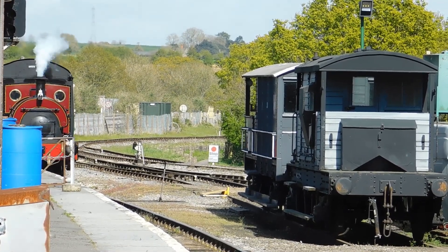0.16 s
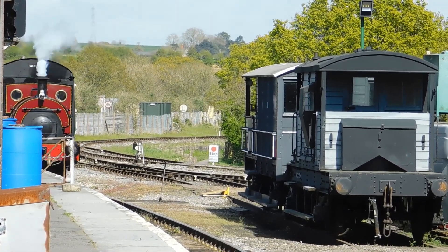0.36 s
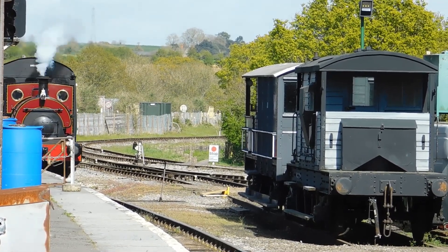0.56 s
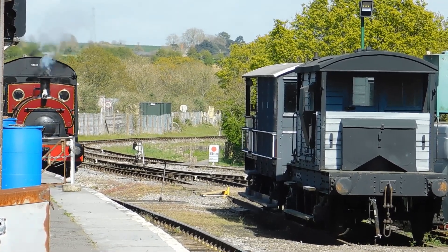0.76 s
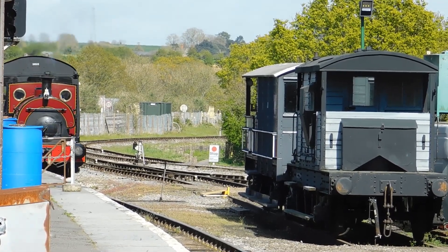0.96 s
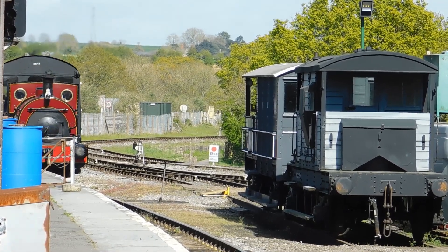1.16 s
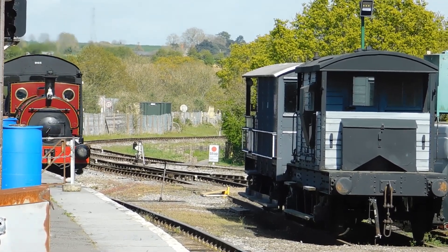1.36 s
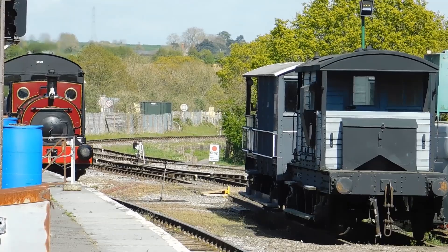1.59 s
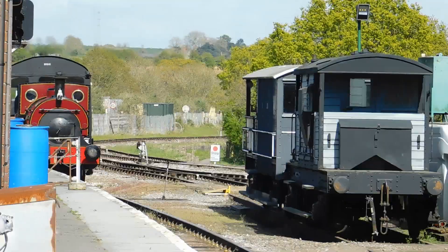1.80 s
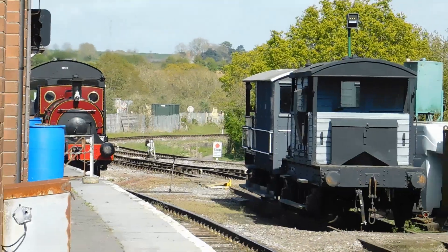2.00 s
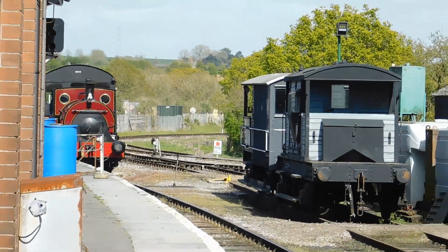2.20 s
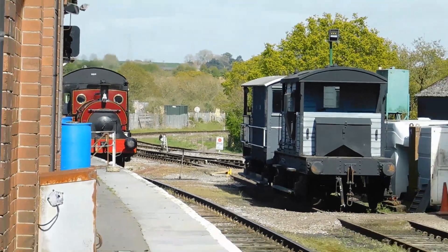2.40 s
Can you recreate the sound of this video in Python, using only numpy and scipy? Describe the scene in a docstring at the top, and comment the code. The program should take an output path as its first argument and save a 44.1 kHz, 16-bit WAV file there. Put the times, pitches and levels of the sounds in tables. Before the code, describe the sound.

One steam train whistle toots and echoes across a yard over a softly simmering engine.

```python
"""One whistle blast from a small rolling steam locomotive, heard in stereo from the platform.
The whistle's bell sounds a low note, jumps up a semitone as the valve opens wide, and sags as it shuts;
the steam jet hisses at its lip and droplets add a gritty spray. Wagons, buildings and trees throw the
blast back across the yard. Underneath, the engine simmers, leaks steam, rumbles and knocks once,
while wind buffets the microphone from the left."""
import sys
import numpy as np
from scipy import signal
from scipy.fft import rfft, irfft
from scipy.io import wavfile
from scipy.ndimage import uniform_filter1d

SR = 44100
rng = np.random.default_rng(int(sys.argv[2]) if len(sys.argv) > 2 else 0)


def dump_mix(stems):
    """Bounce the given channels to the path in sys.argv[1] as a 16-bit WAV at rate SR."""
    frames = np.atleast_2d(stems).T  # one column per channel
    limited = np.clip(frames, -1, 1)  # hard clip at full scale
    pcm = np.round(limited * 32767).astype(np.int16)
    wavfile.write(sys.argv[1], SR, pcm)


N = 108045
T = np.arange(N) / SR
FREQS = np.maximum(np.arange(N // 2 + 1) * SR / N, 1)

# Noise at the microphone. Each row: frequency in Hz, left-right correlation.
MIC_CORRELATION = [(100, 0.73), (800, 1), (1400, 0.56), (2800, 0.076), (6000, 0.39), (13000, 0.19)]
# Its lean to the left. Each row: frequency in Hz, left over right in dB.
MIC_BALANCE = [(100, 7), (800, 2), (1300, 2), (2400, 2), (6000, 0), (15000, 1.5)]
# Wind on the microphone. Each row: centre and half length in seconds, level in dB, top edge in Hz.
GUSTS = [(0.213, 0.022, -37.5, 99.5), (.335, 0.011, -41, 300), (.595, 0.015, -36.5, 192),
         (0.791, 0.0093, -33.5, 220), (0.884, 0.023, -39, 160), (1.085, 0.025, -35.5, 155),
         (1.144, .009, -30, 290), (1.199, 0.033, -39, 230), (1.352, 0.0057, -33, 253),
         (1.412, 0.015, -38, 200), (1.512, 0.0039, -37, 144), (1.647, 0.0088, -35, 306),
         (2.053, 0.034, -37.5, 170), (2.164, 0.022, -33, 447), (2.231, 0.021, -35.5, 199),
         (2.346, 0.028, -37.5, 250), (2.426, 0.042, -41, 221)]

# Colours of the locomotive's noises. Each row: frequency in Hz, relative spectral density in dB.
SIMMER_SPECTRUM = [(530, -45), (970, -21), (1060, -10), (1290, -2), (1880, -9.5), (2300, -13),
                   (3180, -13.5), (3710, -17.5), (4200, -21.5), (5180, -25), (7150, -26.5), (9500, -38),
                   (15500, -46)]
LEAK_SPECTRUM = [(700, -9), (1300, -2), (1900, 6), (2600, -11.5), (4800, -10), (7500, -19.5), (10000, -24),
                 (15500, -29)]
SIZZLE_SPECTRUM = [(2500, -24), (4500, 1.5), (6000, 4), (8000, -7), (11000, -14.5), (15500, -27)]
SPRAY_SPECTRUM = [(2500, -18), (6000, -0.5), (15500, -2.5)]
JET_SPECTRUM = [(300, -39.5), (560, -23), (700, 12.5), (860, 0.5), (980, 2), (1200, -3), (1900, -7),
                (2900, -1), (3600, -11), (5200, -14.5), (8000, -24), (11000, -27), (15500, -32)]
RUMBLE_SPECTRUM = [(20, -7.5), (50, -5.5), (120, -9), (250, -20), (450, -20), (750, -13),
                   (1100, -27), (2500, -52), (15000, -79.5)]
# Rise and fall of the steam noises. Each row: time in seconds, level in dB.
SIMMER_LEVEL = [(0, -44), (.6, -49), (1.2, -43.5), (1.7, -48), (2.1, -45.5), (2.45, -47.5)]
LEAK_LEVEL = [(0, -60.5), (.6, -53), (1.05, -51.5), (1.35, -50), (1.62, -45), (1.65, -57), (1.77, -52.5),
              (2.45, -94)]
SIZZLE_LEVEL = [(0, -55), (.25, -55), (.6, -71), (2.45, -75)]
SPRAY_LEVEL = [(.21, -79.5), (.28, -60), (.61, -60.5), (.65, -72.5), (.685, -60.5), (.82, -60),
               (.86, -65.5), (1.06, -64)]
JET_LEVEL = [(.20, -80.5), (.235, -36.5), (.33, -45.5), (.43, -42.5), (.56, -49), (.65, -58.5), (.69, -34),
             (.78, -38.5), (.83, -42), (.90, -51.5)]
# Resonances and hollows of the simmer. Each row: centre and half width in Hz, level or cut in dB.
SIMMER_PEAKS = [(1077.5, 7.2, -59), (1143, 16, -53.5), (1251.4, 35, -51), (1350, 16, -61),
                (1433, 9.1, -53.5), (3200, 48, -60.5), (4124, 89, -64)]
SIMMER_DIPS = [(1563, 13, -16), (1953, 45, -14.5)]

# The yard's decay. Each row: frequency in Hz, seconds to fall by 60 dB.
YARD_T60 = [(700, 2.7), (1900, 2.24), (3200, 1.7), (8000, 0.84), (15000, 1.3)]
# The yard's colour. Each row: frequency in Hz, relative gain in dB.
YARD_COLOUR = [(730, -5.5), (1150, 2), (1900, 2.5), (3000, 2.5), (5000, -3.5), (8000, -1.5), (12000, 0)]
# Surfaces, near to far. Each row: delay in seconds, low and high note gain in dB before dulling.
ECHOES = [(.05875, -24.3, -12.4), (.10884, -23.8, -1.4), (.14707, -12.2, -21.6), (.24788, -10, -6.7),
          (.31289, -26.3, -10.4), (.43705, -24.3, -14.7), (.52631, -27, -7.8), (.66919, -27.5, -20.8),
          (.9126, -31.5, -24.9), (1.10438, -39, -28.1)]

# Pitch of the whistle's notes. Each row: time in seconds, pitch in Hz.
LOW_PITCH = [(.215, 763.7), (.25, 756.9), (.28, 748.9), (.34, 746.2), (.40, 758.1), (.43, 760.1),
             (.52, 757), (.58, 759.9), (.67, 757.7)]
HIGH_PITCH = [(.667, 817.9), (.69, 799.9), (.715, 789.4), (.75, 803.9), (.81, 788), (.88, 796.5)]
SAG_PITCH = [(.785, 762.7), (.808, 753.7), (.832, 732.2), (.857, 717.2), (.915, 715.6)]
# Their fundamentals. Each row: time in seconds, level in dB.
LOW_LEVEL = [(.215, -46.5), (.224, -28.6), (.24, -30.4), (.262, -13.1), (.365, -12.8), (.42, -18),
             (.435, -15.1), (.545, -12.6), (.577, -14.9), (.61, -11.4), (.635, -19.3), (.705, -17.3),
             (.746, -26.4)]
HIGH_LEVEL = [(.667, -33.7), (.685, -13.5), (.72, -14.1), (.75, -15.9), (.81, -28.3), (.865, -20.1),
              (.885, -24.2)]
SAG_LEVEL = [(.785, -37.9), (.808, -10.5), (.832, -17.3), (.857, -30.2), (.915, -35.4)]
# Their overtones. Each row: time in seconds, levels of partials two, three and four in dB.
LOW_OVERTONES = [(.215, -55.5, -61, -57.5), (.243, -40.5, -35.5, -46.5), (.295, -49, -48, -46.5),
                 (.365, -47, -40, -48.5), (.432, -34.5, -32, -44.5), (.48, -39, -38, -52.5),
                 (.595, -35.5, -36, -51.5), (.66, -48.5, -56.5, -65)]
HIGH_OVERTONES = [(.667, -45.5, -57, -67), (.686, -35, -35.5, -44), (.74, -30, -44, -43),
                  (.79, -43.5, -42, -49.5), (.885, -40, -51, -65)]
SAG_OVERTONES = [(.785, -34.5, -37.5, -48.5), (.915, -57, -48, -69.5)]
# Top partials against the fourth. Each row: multiple, dB in the low and sagging notes, dB in the high.
TOP_PARTIALS = [(5, -12.5, -0.5), (6, -11.5, -11.5), (7, -21, -17)]

TREBLE_FROM_HZ = 780   # above this, echoes dull and the wagons scatter


def from_db(db):
    """Decibels to gain."""
    return 10 ** (np.asarray(db) / 20)


def unit_rms(x):
    """Scale to unit power."""
    return x / np.sqrt(np.mean(x ** 2) + 1e-20)


def in_time(rows):
    """The columns of a curve, joined by straight lines."""
    times, *columns = np.transpose(rows)
    return [np.interp(T, times, column) for column in columns]


def at_hz(rows, hz):
    """Read a spectrum on a log-frequency axis."""
    row_hz, values = np.transpose(rows)
    return np.interp(np.log(hz), np.log(row_hz), values)


def pan(left_db):
    """Left and right gains for a level difference."""
    return from_db(np.array([[.5], [-.5]]) * left_db)


def swell(centre_s, half_length_s):
    """A bell-shaped rise and fall."""
    return np.exp(-.5 * ((T - centre_s) / half_length_s) ** 2)


def gate(rows):
    """Open from the first to the last point of a curve."""
    return uniform_filter1d(((T > rows[0][0]) & (T < rows[-1][0])) * 1., size=200)


def drift(rate_hz):
    """A random wander with spread 1."""
    return unit_rms(irfft(rfft(rng.standard_normal(N)) / (1 + (FREQS / rate_hz) ** 2), N))


def stereo_noise(colour):
    """Unit-power noise, left of the microphone and wider in the treble."""
    mid, side = rfft(rng.standard_normal((2, N)))
    alike = at_hz(MIC_CORRELATION, FREQS)
    pair = np.sqrt(1 + alike) * mid + np.sqrt(1 - alike) * side * [[1], [-1]]
    return unit_rms(irfft(pair * colour * pan(at_hz(MIC_BALANCE, FREQS)), N))


def hiss(spectrum):
    """Stereo noise from a spectrum table."""
    return stereo_noise(from_db(at_hz(spectrum, FREQS)))


def resonance(hz, half_width_hz):
    """Stereo noise in one resonance."""
    return stereo_noise(1 / (1 + ((FREQS - hz) / half_width_hz) ** 2))


def wind():
    """Short low buffets right on the microphone, mostly on its left side."""
    gusts = 0
    for centre_s, half_length_s, db, top_hz in GUSTS:
        buffet = stereo_noise(1 / (1 + (FREQS / top_hz) ** 3.36))
        gusts += from_db(db) * swell(centre_s, half_length_s) * buffet
    return gusts * from_db([[0], [-12.5]])


def engine():
    """Simmering steam with singing resonances, two leaks, one dull knock and the rumble of rolling."""
    dips_db = sum(db * np.exp(-((FREQS - hz) / width) ** 2) for hz, width, db in SIMMER_DIPS)
    simmer_gain = from_db(in_time(SIMMER_LEVEL)[0] + 2 * drift(rate_hz=9.6))
    simmer = simmer_gain * stereo_noise(from_db(at_hz(SIMMER_SPECTRUM, FREQS) + dips_db))
    singing = sum(from_db(db) * resonance(hz, width) for hz, width, db in SIMMER_PEAKS)
    leak = from_db(in_time(LEAK_LEVEL)[0]) * hiss(LEAK_SPECTRUM)
    sizzle = from_db(in_time(SIZZLE_LEVEL)[0]) * hiss(SIZZLE_SPECTRUM)
    knock = from_db(-40.5) * swell(1.817, half_length_s=.01) * resonance(670, half_width_hz=160)
    rumble = from_db(-49) * hiss(RUMBLE_SPECTRUM)
    return simmer + singing + leak + sizzle + knock + rumble


def yard_scatter(blast):
    """Trees and wagons around the platform scatter the blast into a tail that dies band by band."""
    build_s = .026
    edges_hz = np.geomspace(225, 15800, 10)
    wagons = from_db(1) * swell(.18, half_length_s=.023)   # a treble burst off the parked wagons
    scatter, response = rfft(stereo_noise(1.)), 0
    for low, high in zip(edges_hz, edges_hz[1:]):
        hz = np.sqrt(low * high)
        band = irfft(scatter * ((FREQS >= low) & (FREQS < high)), N)
        envelope = from_db(-60 * T / at_hz(YARD_T60, hz)) + wagons * (low > TREBLE_FROM_HZ)
        response += band * from_db(at_hz(YARD_COLOUR, hz)) * envelope
    response *= (1 - np.exp(-T / build_s)) * np.sqrt(10 / SR)
    return from_db(-7.5) * signal.fftconvolve(blast.mean(0)[None], response, axes=1)[:, :N]


def echoes(low, high):
    """Single reflections, duller the more distant the surface; each surface favours one note."""
    dull_db_per_octave_s, lag_s = 27, .0001
    size = 2 * N
    hz = np.arange(N + 1) * SR / size
    octaves = np.log2(np.maximum(hz / TREBLE_FROM_HZ, 1))
    # The notes come back rounder than they left.
    round_low = rfft(low.mean(0), size) * from_db(-3.5 * octaves)
    round_high = rfft(high.mean(0), size) * from_db(-4 * octaves)
    returns = 0
    for k, (delay_s, low_db, high_db) in enumerate(ECHOES):
        arrival_s = delay_s + (-1) ** k * lag_s * np.array([[.5], [-.5]])   # each side leads in turn
        path = np.exp(-2j * np.pi * hz * arrival_s) * from_db(-dull_db_per_octave_s * octaves * delay_s)
        returns += (from_db(low_db) * round_low + from_db(high_db) * round_high) * path
    return irfft(returns * pan(left_db=2), size)[:, :N]


def spray():
    """Droplets in the steam make a sustained, gritty top hiss."""
    grit = unit_rms(from_db(5 * drift(rate_hz=600)) * hiss(SPRAY_SPECTRUM))
    return gate(SPRAY_LEVEL) * from_db(in_time(SPRAY_LEVEL)[0]) * grit


def steam_jet():
    """The jet that drives the whistle sputters at its lip."""
    sputter_db = 2 * drift(rate_hz=15)
    return gate(JET_LEVEL) * from_db(in_time(JET_LEVEL)[0] + sputter_db) * hiss(JET_SPECTRUM)


def pipe_note(pitch, level, overtones, top_db):
    """A pipe tone with a slight jitter; its overtones flutter in the air on the way to the microphone."""
    jitter_rad, rasp_rad, flutter_db, flutter_hz = .099, .11, 3.5, 23
    spread_rad = np.sqrt(-np.log(.5))   # leaves the overtones half alike left and right
    second, third, fourth = in_time(overtones)
    phase = 2 * np.pi * np.cumsum(in_time(pitch)[0]) / SR + jitter_rad * drift(rate_hz=31)
    tone = from_db(in_time(level)[0]) * np.sin(phase) * pan(left_db=4)
    partials_db = [second, third, fourth] + [fourth + db for db in top_db]
    for multiple, db in enumerate(partials_db, 2):
        gain = from_db(db + flutter_db * drift(flutter_hz))
        rough_phase = multiple * (phase + rasp_rad * drift(rate_hz=85))
        pair = np.array([np.sin(rough_phase + spread_rad * drift(flutter_hz)) for _ in range(2)])
        tone += gain * pan(left_db=.95) * pair
    return np.sqrt(2) * tone * gate(level)


def whistle():
    """Steam sounds the bell: the low note with its opening spit and closing sag, and the high note."""
    spit_hz = 803.8   # the upper note speaks briefly as the valve cracks open
    _, soft_top_db, hard_top_db = np.transpose(TOP_PARTIALS)
    spit = from_db(-24) * swell(.24, half_length_s=.01) * np.sin(2 * np.pi * spit_hz * T)
    low = pipe_note(LOW_PITCH, LOW_LEVEL, LOW_OVERTONES, soft_top_db)
    sag = pipe_note(SAG_PITCH, SAG_LEVEL, SAG_OVERTONES, soft_top_db)
    high = pipe_note(HIGH_PITCH, HIGH_LEVEL, HIGH_OVERTONES, hard_top_db)
    return spit + low + sag, high


def scene():
    """From the platform: the blast and its reflections over engine and wind."""
    low, high = whistle()
    jet = steam_jet()
    scattered = yard_scatter(from_db(-11) * low + high + jet)   # the softer low note scatters less
    blast = low + high + jet + spray()
    return blast + echoes(low, high) + scattered + engine() + wind()


def record(dry):
    """The top is cut steeply at 15.8 kHz."""
    return signal.sosfiltfilt(signal.ellip(10, .1, 70, 15800, fs=SR, output="sos"), dry)


dry = scene()
out = record(dry)
dump_mix(out)
```